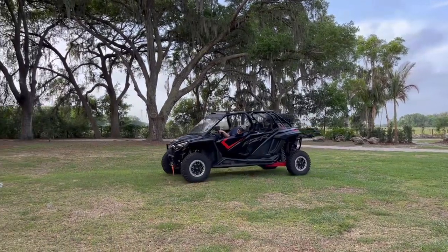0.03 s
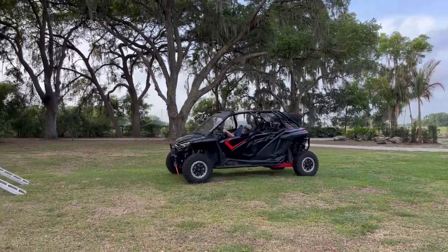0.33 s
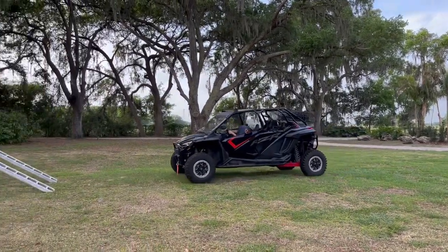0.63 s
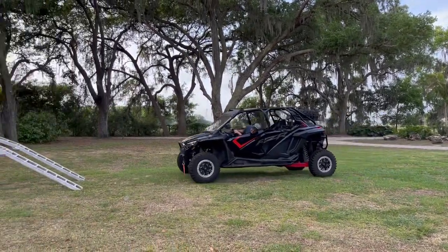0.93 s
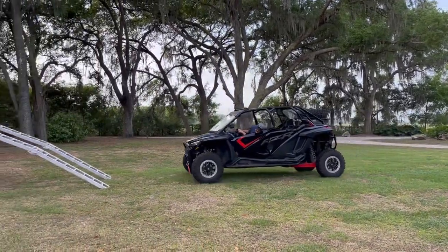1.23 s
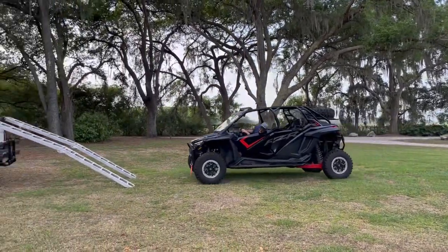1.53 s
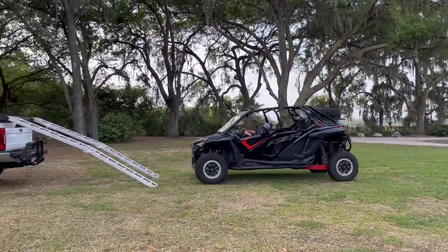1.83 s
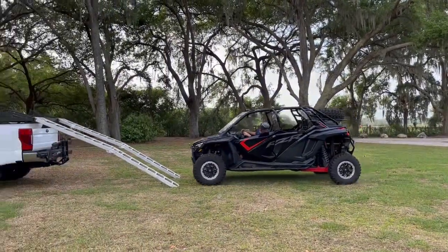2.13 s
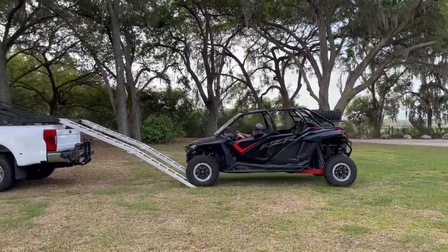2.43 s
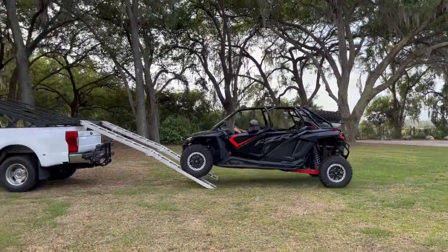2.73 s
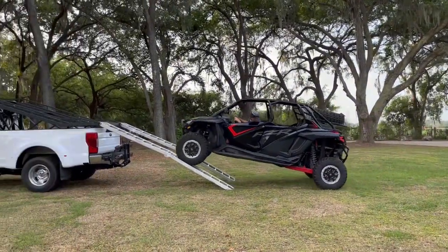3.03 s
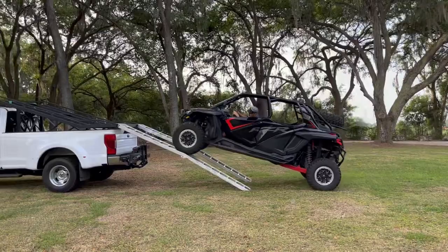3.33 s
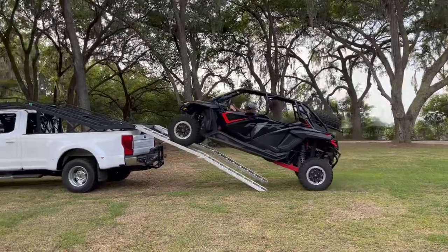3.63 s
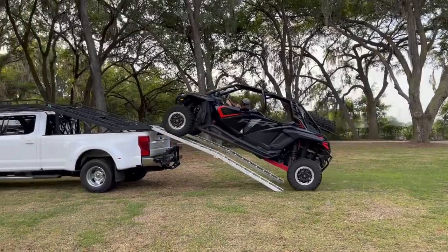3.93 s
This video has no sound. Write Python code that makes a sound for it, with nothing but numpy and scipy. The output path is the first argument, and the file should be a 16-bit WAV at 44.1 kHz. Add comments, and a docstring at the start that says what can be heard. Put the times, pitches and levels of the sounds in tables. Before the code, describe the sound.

A small off-road vehicle's engine throbs and clatters as it crawls over a lawn. The throttle opens, then the front tyres climb aluminium ramps with clanks, rattles and brief ringing. Heard outdoors from several metres away.

```python
"""A two-cylinder engine throbs and clatters as a small off-road vehicle crawls over a lawn.
Its exhaust pulses with the firings, its air intake growls, gears whirr, the drive belt rasps and
chatters, and the tyres hiss in the grass. At about 2 s the throttle opens; from 2.5 s the front tyres
climb aluminium ramps onto a truck, and the struck metal clanks, rattles and rings.
Heard outdoors from several metres, through two microphone openings set close together."""
import sys
import numpy as np
from scipy import signal
from scipy.fft import rfft, irfft
from scipy.io import wavfile
from scipy.ndimage import uniform_filter1d

SR = 44100
rng = np.random.default_rng(int(sys.argv[2]) if len(sys.argv) > 2 else 0)


def transcribe(u):
    """Save the signal u as a 16-bit wav file named by the first command-line argument.

    u: samples, shape (n,) or (channels, n), limited to [-1, 1]; the rate is SR.
    q: integer samples, one column per channel.
    """
    v = np.clip(np.atleast_2d(u).T, -1, 1)
    q = np.round(v * 32767).astype(np.int16)
    wavfile.write(sys.argv[1], SR, q)


N = 176400
T = np.arange(N) / SR
HZ = np.fft.rfftfreq(N, 1 / SR)

# engine speed, in cycles per second; each cylinder fires once a cycle: t/s, f/Hz
ENGINE_SPEED = [(0.0, 22.2), (0.14, 22.94), (0.29, 23.66), (0.34, 23.98), (0.6, 22.12), (0.9, 23.62),
                (1.1, 22.93), (1.86, 23.65), (1.96, 24.75), (2.09, 27.12), (2.17, 28.11), (2.38, 29.11),
                (2.53, 30.69), (2.61, 30.89), (2.92, 29.4), (3.44, 28.7), (3.75, 30.3), (4.0, 33.19)]
# how hard the engine works: t/s, load (0 coasting, 1 pulling)
ENGINE_LOAD = [(0, 0.3), (.35, 0.13), (.6, 0.14), (1.88, 0.03), (2.15, 0.76), (2.55, 0.88), (3.4, 0.79),
               (4, 0.8)]
# loudness of the engine's clatter, which the block's knocking follows: t/s, level/dB
CLATTER_LEVEL = [(0, -41.5), (.35, -39), (.6, -41), (1.2, -40), (1.85, -37.5), (2.1, -35.5), (2.45, -34.5),
                 (3, -32.5), (3.45, -33.5), (4, -33.5)]
# tone of a blow on the ramps: f/Hz, level/dB
CLANK_TONE = [(100, -26.5), (300, -0.5), (600, -1), (850, 3), (1300, 4), (1650, -4), (2000, -3),
              (2700, -1.5), (3400, -6), (4100, -6.5), (4700, -10.5), (6500, -10.5), (9000, -18.5),
              (12000, -24), (14500, -28.5)]
# uneven firing: the second cylinder comes this share of a cycle after the first, a little weaker
FIRING_GAP, SECOND_DB = .375, -0.5


def amp(db):
    """Turns decibels into a factor to multiply by."""
    return 10 ** (np.asarray(db) / 20)


def unit(x):
    """Scales a signal to an average strength (rms) of 1."""
    return x / np.sqrt(np.mean(x ** 2) + 1e-20)


def curve(rows):
    """Joins (time, value) points with straight lines, giving a value for every sample."""
    return np.interp(T, *np.transpose(rows))


def read(rows, hz, column=1):
    """Looks up frequencies in a table, on a logarithmic scale like musical pitch."""
    table = np.transpose(rows)
    return np.interp(np.log(hz + 1), np.log(table[0] + 1), table[column])


def add(mix, start_s, sound):
    """Adds a sound to the mix at a given time."""
    part = mix[:, round(start_s * SR):][:, :sound.shape[1]]
    part += sound[:, :part.shape[1]]


def causal(db):
    """A filter with these levels that never rings early: log gain (real part), phase (imaginary)."""
    cepstrum = irfft(db * np.log(10) / 20)
    half = len(cepstrum) // 2
    cepstrum[1:half] *= 2
    cepstrum[half + 1:] = 0
    return rfft(cepstrum)


def colour(x, rows, tilt_db=0, column=1):
    """Gives x a table's tone, tilted by tilt_db per octave; white noise keeps its power."""
    hz = np.fft.rfftfreq(x.shape[-1], 1 / SR)
    gain = np.exp(causal(read(rows, hz, column) + tilt_db * np.log2(hz / 1000 + .5)))
    return irfft(rfft(x) * gain / np.sqrt(np.mean(abs(gain) ** 2)), x.shape[-1])


def noise(length=N):
    """Two unrelated channels of white noise."""
    return rng.standard_normal((2, length))


def drift(hz):
    """A random wobble of strength 1, with little in it faster than hz."""
    return unit(irfft(rfft(rng.standard_normal(N)) * np.exp(-(HZ / hz) ** 2), N))


def cycles():
    """Counts engine cycles; the first cylinder fires at each whole number."""
    return np.cumsum(curve(ENGINE_SPEED)) / SR - .1


def puffs(decay_cycles):
    """One curve per cylinder that jumps to 1 when it fires, then fades."""
    turn = cycles()
    return [np.exp(-((turn - place) % 1) / decay_cycles) for place in (0, FIRING_GAP)]


def exhaust():
    """A pressure wave repeats each engine cycle; its low tones fill in when the engine pulls."""
    # the wave's tones: multiple of the cycle rate, coasting level/dB, pulling level/dB
    harmonics = [(1, -61.5, -32.5), (2, -12, 2), (3, -19, -9), (4, -24.5, -13.5), (5, 1.5, 2.5),
                 (6, -12.5, -6.5), (7, -26.5, -23), (8, -11, -13.5), (9, -20.5, -21.5), (10, -19.5, -35.5),
                 (11, -21.5, -19.5), (12, -33, -36), (13, -31.5, -23.5), (14, -32, -34.5), (15, -31.5, -34),
                 (16, -27.5, -25.5), (17, -37.5, -51.5), (18, -27.5, -39), (19, -33, -27.5),
                 (20, -37.5, -43.5), (21, -37.5, -31), (22, -26.5, -44.5), (23, -43.5, -27.5),
                 (24, -44, -34.5), (25, -39.5, -39.5), (26, -38.5, -48), (27, -32, -47.5), (28, -46, -43),
                 (29, -37, -47.5), (30, -44, -40), (31, -47, -45), (32, -36, -33)]
    # the silencer's resonances, which the tones slide through: f/Hz, level/dB
    silencer = [(60, 0), (100, 1), (140, 0), (200, 0), (232, 2.5), (262, -2), (300, -3), (325, -3),
                (360, 2), (420, 0), (510, 1), (600, 2), (720, 2), (900, 0)]
    # loudness of the exhaust: t/s, level/dB
    loudness = [(0, -16), (.15, -14.5), (.38, -14.5), (.6, -16), (.78, -16), (.9, -15.5), (1.05, -16),
                (1.2, -15.5), (1.7, -16), (2, -15), (2.4, -15), (2.6, -14), (3, -14), (3.3, -14),
                (3.65, -12.5), (4, -14.5)]
    speed, load, angle = curve(ENGINE_SPEED), curve(ENGINE_LOAD), 2 * np.pi * cycles()
    coast, pull = (causal(np.r_[db[0], db, db[-1]])[1:-1] for db in np.transpose(harmonics)[1:])
    wave, power = np.zeros((2, N))
    for k, (coasting, pulling) in enumerate(zip(coast, pull), 1):
        blend = coasting + load * (pulling - coasting)
        level = np.exp(blend.real) * amp(np.interp(k * speed, *np.transpose(silencer)))
        waver_db = 0.92 * (1 - np.minimum(level, 1) / 2) * drift(hz=5.4)  # weak tones waver most
        wave += level * amp(waver_db) * np.cos(k * angle + blend.imag)
        power += level ** 2 / 2
    return wave / np.sqrt(power) * amp(curve(loudness))


def rumble():
    """Tyres and exhaust gas make a steady low rumble."""
    # tone of the rumble: f/Hz, level/dB
    tone = [(10, -6.5), (28, -12.5), (55, 2.5), (90, 5), (150, 3.5), (240, -6.5), (330, -22), (700, -45),
            (3000, -84.5)]
    return colour(noise(), tone) * amp(-31)


def engine_block():
    """Each firing knocks the engine block and the body, which answer with a short ring."""
    # tone of block and body: f/Hz, level/dB
    tone = [(200, -29.5), (370, -4.5), (510, -4), (630, 1.5), (745, -8), (830, -17.5), (1120, -4),
            (1350, -13.5), (2400, -16.5), (5000, -37), (14000, -60.5)]
    t60, spread_db = 0.18, 3.5  # t60: the seconds a sound takes to fade by 60 dB
    t, out = np.arange(4096) / SR, np.zeros((2, N))
    for place, db in ((0, 0), (FIRING_GAP, SECOND_DB)):
        firings = np.floor(cycles() - place)
        blows = np.diff(firings, prepend=firings[0]) * amp(db + spread_db * rng.standard_normal(N))
        ring = noise(len(t)) * amp(-60 * t / t60)
        out += signal.oaconvolve(blows[None], ring, axes=1)[:, :N]
    return unit(colour(out, tone)) * amp(curve(CLATTER_LEVEL) - 9)


def intake():
    """Each gulp of air rings the engine's airbox with a hollow growl."""
    # tone of the airbox: f/Hz, level/dB
    tone = [(200, -39), (440, -21.5), (510, -3), (600, 2), (700, -5), (760, -5), (830, -22), (2000, -46)]
    # loudness as the vehicle nears and pulls: t/s, level/dB
    loudness = [(0, -58.5), (.7, -48), (1.3, -41), (1.8, -49.5), (2.1, -41), (2.45, -42), (2.65, -41),
                (3, -50), (3.5, -46.5), (4, -57)]
    gulps = unit(sum(puffs(decay_cycles=0.41)))
    return colour(noise() * gulps, tone) * amp(curve(loudness))


def clatter():
    """Gas and valve noise swells with each firing and brightens when the engine pulls."""
    # tone of the clatter: f/Hz, coasting level/dB, pulling level/dB
    tone = [(150, -20, -14.5), (293, -6.5, -12.5), (417, -8.5, -6.5), (497, 0, -4.5), (630, -5, -5),
            (860, -10.5, -10.5), (1000, -3, -1.5), (1104, -6, 2), (1222, -13.5, -9.5), (1460, -8.5, 1.5),
            (1510, -18.5, -11), (1770, -12.5, -9.5), (2350, -17.5, -10.5), (2830, -20, -15.5),
            (4200, -30.5, -25.5), (4900, -35, -30), (6900, -36, -32), (8500, -37, -39), (12000, -39, -34),
            (14500, -42.5, -41.5)]
    first, second = puffs(decay_cycles=0.25)
    swell = unit(2.2 + first + amp(SECOND_DB) * second)  # puffs on top of a steady flow
    gas = noise() * swell * amp(0.5 * drift(hz=120))
    load = curve(ENGINE_LOAD)
    blend = (1 - load) * colour(gas, tone) + load * colour(gas, tone, column=2)
    return blend * amp(curve(CLATTER_LEVEL))


def belt_rasp():
    """The running drive belt makes a rough, fluttering rasp."""
    # tone of the rasp: f/Hz, level/dB
    tone = [(500, -33.5), (1400, 1), (2300, -3), (3700, -4), (5500, -23.5), (14000, -34)]
    # loudness of the rasp: t/s, level/dB
    loudness = [(0, -51), (.38, -54), (.55, -68), (1.9, -59), (2.5, -60.5), (3.4, -50.5), (4, -45.5)]
    return colour(noise(), tone) * amp(curve(loudness) + 1.8 * drift(hz=52))


def housing_whine():
    """The casing of the drive sings faintly at a few pitches."""
    # resonances of the casing: f/Hz, width/Hz, level/dB
    peaks = [(1668, 60, 7), (2350, 51, 5.5), (4040, 60, -11.5)]
    # loudness of the whine: t/s, level/dB
    loudness = [(0, -48), (.15, -47.5), (.35, -57), (.55, -69), (4, -69.5)]
    shape = sum(amp(db) / (1 + (2 * (HZ - hz) / width) ** 2) for hz, width, db in peaks)
    return unit(irfft(rfft(noise()) * shape, N)) * amp(curve(loudness))


def gearbox():
    """The gears whirr, louder as the vehicle nears."""
    # the gearbox's two resonances: f/Hz, level/dB
    tone = [(700, -43), (930, -18.5), (1010, 0), (1060, -5), (1095, -8), (1150, 2.5), (1185, -5),
            (1235, -27.5), (1700, -43.5)]
    # loudness of the whirr: t/s, level/dB
    loudness = [(0, -53.5), (.6, -54.5), (1.15, -48), (1.35, -47.5), (1.6, -45), (1.85, -44.5), (2.2, -39),
                (2.6, -42.5), (3.3, -41), (4, -44)]
    flutter = unit(amp(2 * drift(hz=20)))
    return colour(noise() * flutter, tone) * amp(curve(loudness))


def slack_belt():
    """The drive belt chatters in fits while it runs slack."""
    # tone of the chatter: f/Hz, level/dB
    tone = [(1400, -34.5), (1640, -13), (1760, -0.5), (1830, -6.5), (1900, -2), (2000, -12.5), (2220, -8.5),
            (2380, 1), (2520, -8), (2750, -16), (2930, -12), (3300, -26), (6000, -44.5)]
    # loudness of the chatter: t/s, level/dB
    loudness = [(0, -53.5), (.35, -56), (.55, -62.5), (.72, -51.5), (.9, -51.5), (1.15, -53), (1.4, -57.5),
                (1.85, -56), (2.05, -43), (2.3, -53), (2.6, -70.5)]
    fits = unit(amp(4.5 * np.tanh(drift(hz=20))))
    return colour(noise() * fits, tone) * amp(curve(loudness))


def grass():
    """Tyres crush the grass with a fine hiss."""
    # tone of the hiss: f/Hz, level/dB
    tone = [(500, -24), (3000, 2), (6000, -6.5), (8500, -6.5), (11500, -1), (14500, -7.5)]
    # loudness of the hiss: t/s, level/dB
    loudness = [(0, -67.5), (.8, -67.5), (1.8, -69), (2.4, -59.5), (3.2, -59), (3.6, -55.5), (4, -53)]
    return colour(noise(), tone) * amp(curve(loudness) + 1.2 * drift(hz=150))


def tread():
    """The tyres' knobs patter on the rungs and keep the ramps' lower notes ringing."""
    # loudness of the patter: t/s, level/dB
    loudness = [(2.45, -74), (2.55, -36), (2.68, -34), (2.87, -37), (3, -46), (3.2, -37), (3.4, -46.5),
                (3.6, -49.5), (4, -41)]
    taps_per_s, t60 = 260, 0.05
    t, level = np.arange(SR // 10) / SR, amp(curve(loudness))
    taps = (rng.random(N) < taps_per_s / SR) * rng.uniform(0.41, 1, N)
    slap = noise(len(t)) * amp(-60 * t / t60)
    slaps = signal.oaconvolve(taps[None], slap, axes=1)[:, :N]
    patter = unit(colour(slaps, CLANK_TONE, tilt_db=-1.5)) * level
    push = unit(colour(slaps, CLANK_TONE, tilt_db=-8)) * level
    return patter + amp(0.5) * ramp_ring(push)


def ramp_ring(push):
    """Two aluminium ramps ring, slightly out of tune with each other, as strongly as they are pushed."""
    # a ramp's own notes: f/Hz, level/dB, t60/s
    notes = [(463, -10, .2), (587, -4, .22), (705, -4, .22), (1141, -3, .35), (1410, 0, .45),
             (1512, -6, .25), (1841, -7, .3), (1985, -7, .3), (2735, 2, .35), (2977, -7, .25),
             (3570, -7, .3), (4187, -0.5, .3), (4254, -4, .2), (6590, -3, .2)]
    t, ring = np.arange(SR) / SR, np.zeros((2, SR))
    for hz, db, t60 in notes:
        for detune, share in ((0, 1), (0.0082, .45)):
            phase = 2 * np.pi * (hz * (1 + detune) * t + rng.random((2, 1)))
            ring += share * amp(db - 60 * t / t60) * np.sin(phase)
    return unit(signal.fftconvolve(push, ring, axes=1)[:, :N]) * np.sqrt(np.mean(push ** 2))


def ramp_knocks():
    """Tyre blows flex the deck and rattle loose metal; the first, on the free ramps, ring them most."""
    # the blows: t/s, clank level/dB, tilt/(dB per octave), t60/s, thud level/dB, share into the rails/dB
    blows = [(2.498, -34, 0.5, 0.16, -46, 2.5), (2.512, -24.5, 0, 0.08, -31.5, -1.5),
             (2.527, -31, -1, 0.11, -30, 4.5), (2.568, -28, 3, 0.13, -29, 7),
             (2.593, -29, 2.5, 0.13, -34, 5), (2.6051, -25.5, 0, 0.098, -33.5, 5.5),
             (2.675, -28, -1, 0.19, -38.5, 1.5), (2.7236, -28, -1, .13, -35.5, -4),
             (2.763, -38, -1.5, 0.099, -36, 0), (2.816, -41, 8.5, .13, -37, -6.5),
             (2.835, -28.5, 1, 0.21, -36.5, -4), (2.866, -33.5, 3, .14, -34, -5.5),
             (2.942, -34.5, -2, .12, -48.5, -1), (3.063, -34.5, 4.5, 0.15, -37.5, -8),
             (3.147, -29, -2, 0.11, -41, -4), (3.1603, -26.5, -1.5, .13, -47.5, -2.5),
             (3.186, -31, -4, 0.083, -44.5, -5.5), (3.2322, -26.5, -2, 0.12, -45.5, -2),
             (3.253, -32.5, -1, 0.13, -35, -3), (3.4324, -33.5, -2.5, 0.16, -48, -9),
             (3.5463, -32.5, -3.5, 0.16, -43, -6)]
    # tone of the flexing deck's thud: f/Hz, level/dB
    thud_tone = [(60, -17), (120, 2.5), (280, 3.5), (400, -4), (560, 1), (700, 5.5), (850, -15),
                 (1200, -11.5), (2000, -30.5), (8000, -77)]
    rise_s, tail_t60, deck_t60, thud_t60 = 0.00093, 0.28, 0.041, 0.25
    bounces_per_s, rattle_gain = 480, amp(1.5)
    n = SR // 2
    t = np.arange(n) / SR
    clanks, thuds, rails = np.zeros((3, 2, N))
    rise = 1 - np.exp(-t / rise_s)
    tail = amp(-11.5 - 60 * t / tail_t60)
    deck_tap = unit(noise(n) * amp(-60 * t / deck_t60)) / np.sqrt(n)
    for start_s, db, tilt_db, t60, thud_db, ring_db in blows:
        envelope = rise * (amp(-60 * t / t60) + tail)
        grain_db = -0.5 * unit(uniform_filter1d(rng.standard_normal(n), size=90))
        bounces = unit(rng.random(n) < bounces_per_s / SR)
        rattle = signal.fftconvolve((bounces * envelope)[None], deck_tap, axes=1)[:, :n]
        burst = noise(n) * unit(amp(grain_db)) * envelope
        strike = (burst + rattle_gain * rattle) / np.hypot(1, rattle_gain)
        clank = amp(db) * colour(strike, CLANK_TONE, tilt_db)
        add(clanks, start_s, clank)
        add(rails, start_s, amp(ring_db) * clank)
        add(thuds, start_s, noise(n) * rise * amp(thud_db - 60 * t / thud_t60))
    return clanks + amp(-7.5) * ramp_ring(rails) + colour(thuds, thud_tone)


def ramp_cracks():
    """The ramps jump and metal hits metal: bright bursts that die at once."""
    # the hits: t/s, level/dB, centre f/Hz, width/octaves, t60/s
    hits = [(2.512, -38, 10800, 0.51, 0.08), (2.5672, -23, 7200, 0.19, .022),
            (2.573, -30.5, 6000, .3, 0.13), (2.606, -24.5, 2980, .3, 0.066), (2.765, -46.5, 11500, .4, .06),
            (2.837, -38, 11000, 0.55, 0.057), (2.868, -45, 11000, 0.41, .05),
            (3.062, -49, 7000, 0.61, 0.029)]
    t, out = np.arange(8192) / SR, np.zeros((2, N))
    hz = np.geomspace(200, 20000, 40)
    for start_s, db, centre_hz, octaves, t60 in hits:
        band_db = -20 * np.log10(1 + (np.log2(hz / centre_hz) / octaves) ** 2)
        burst = noise(len(t)) * amp(db - 60 * t / t60)
        add(out, start_s, colour(burst, np.c_[hz, band_db]))
    return out


def microphones(mix):
    """Makes left and right, alike in the bass: channel 0 is common to both, channel 1 sets them apart."""
    # the two openings: f/Hz, likeness (0-1), left minus right level/dB, left phase lead/rad
    pair = [(60, .97, .5, .02), (150, .96, .7, .06), (300, .9, .8, .12), (630, .72, 1.2, .1),
            (1050, .62, 2, .3), (1400, .5, 2, -1.9), (1900, .82, 2.2, 0), (3000, .68, 2.3, .75),
            (4300, .58, 3.5, .6), (5500, .4, 2, -.4), (7000, .6, 1, -2.3), (7800, .95, 0, -3.1),
            (8900, .96, 0, -3.2), (9600, .7, 0, -3.7), (10800, .96, 0, -6.1), (13000, .95, 0, -6.4),
            (14400, .8, 0, -9.2)]
    first, second = rfft(mix)
    likeness = read(pair, HZ)
    lean = amp(read(pair, HZ, column=2) / 2) * np.exp(.5j * read(pair, HZ, column=3))
    common = first * np.sqrt((1 + likeness) / 2)
    apart = second * np.sqrt((1 - likeness) / 2)
    return irfft(np.array([(common + apart) * lean, (common - apart) / lean]), N)


def scene():
    """Engine, drive, tyres and ramps together at the microphones."""
    throb = exhaust() * np.array([[1], [0]])  # in the common channel only
    engine = throb + rumble() + engine_block() + intake() + clatter()
    drive = belt_rasp() + housing_whine() + gearbox() + slack_belt()
    return microphones(engine + drive + grass() + tread() + ramp_knocks() + ramp_cracks())


def record(dry):
    """Cuts off the highest treble, above 14900 Hz."""
    lowpass = signal.firwin(511, 14900, window=("kaiser", 9), fs=SR)
    return signal.oaconvolve(dry, lowpass[None], "same")


dry = scene()
out = record(dry)
transcribe(out)
```